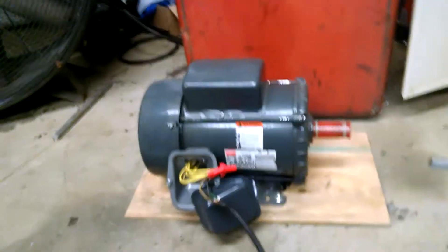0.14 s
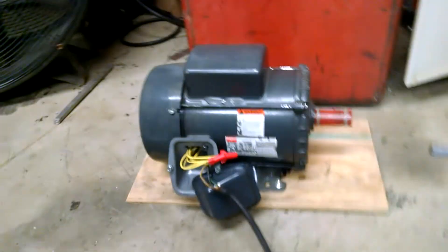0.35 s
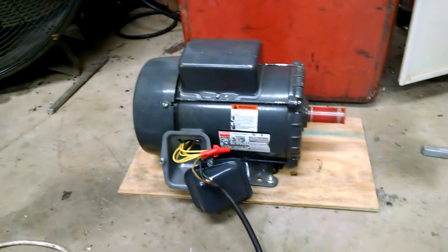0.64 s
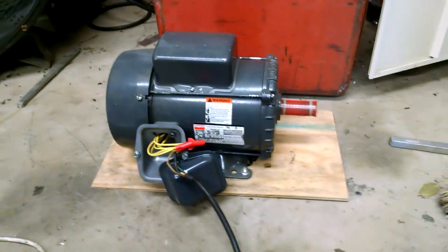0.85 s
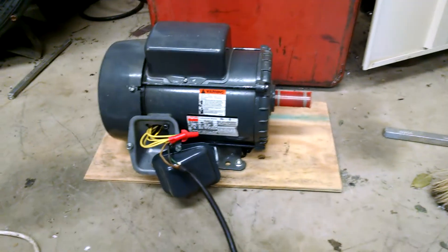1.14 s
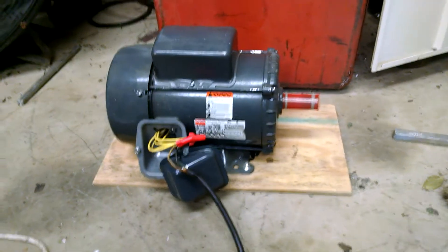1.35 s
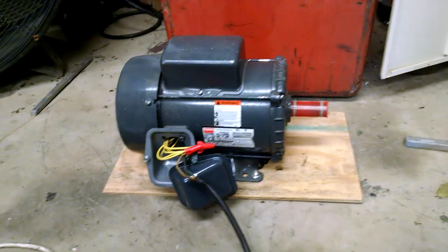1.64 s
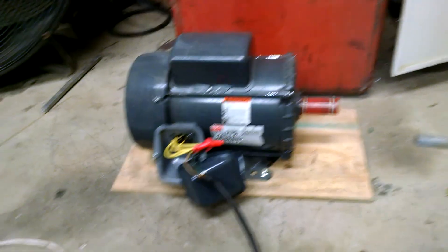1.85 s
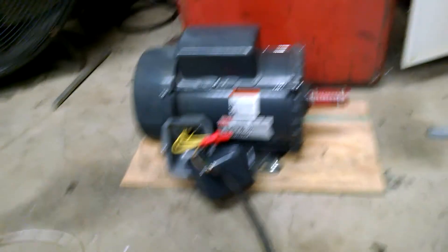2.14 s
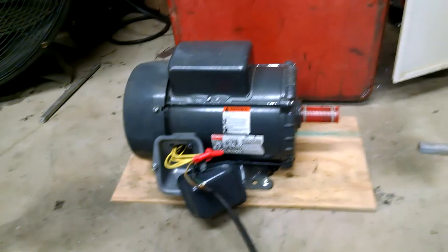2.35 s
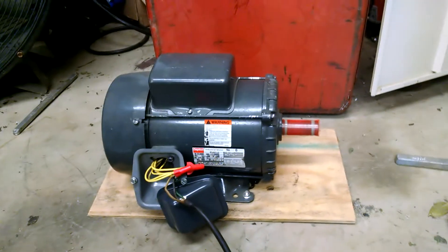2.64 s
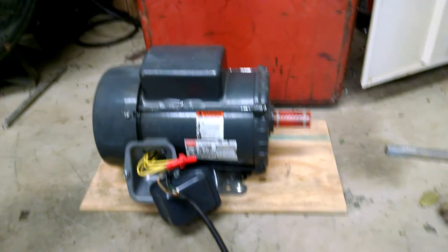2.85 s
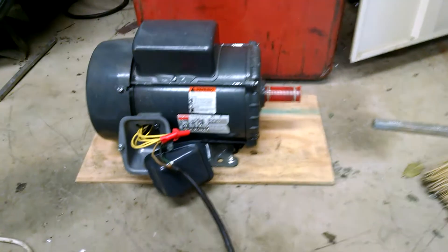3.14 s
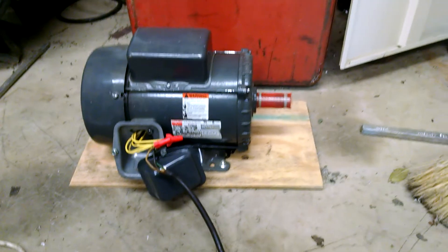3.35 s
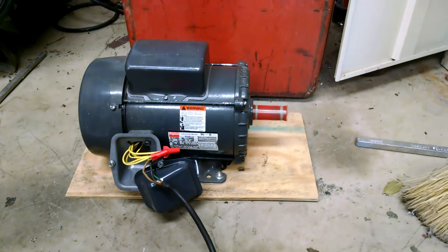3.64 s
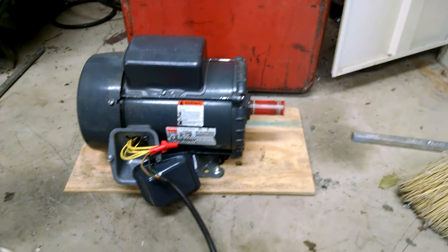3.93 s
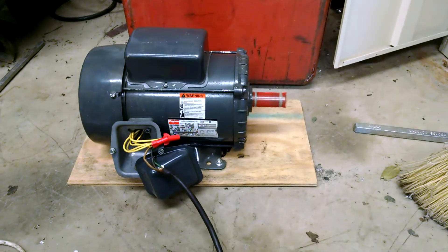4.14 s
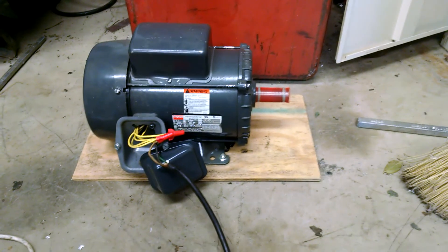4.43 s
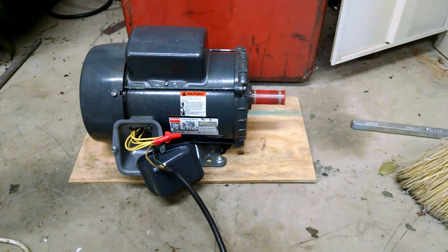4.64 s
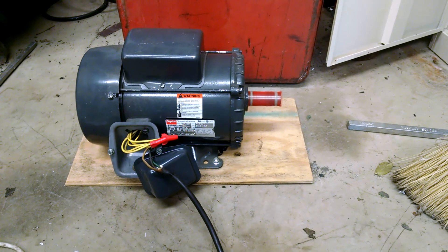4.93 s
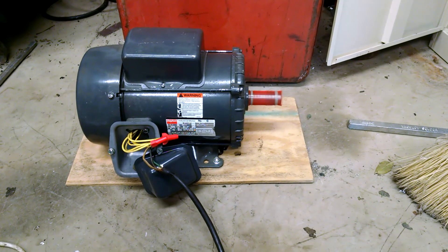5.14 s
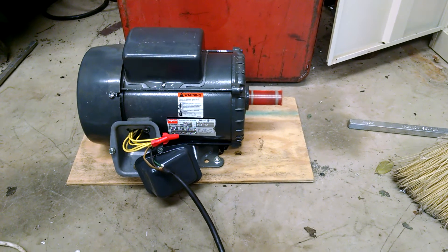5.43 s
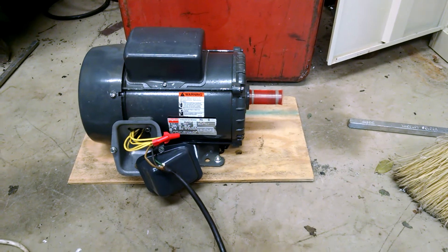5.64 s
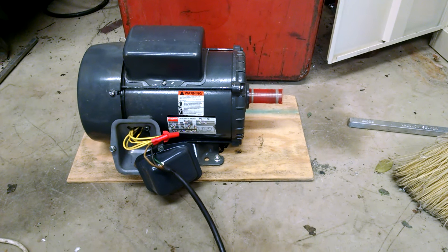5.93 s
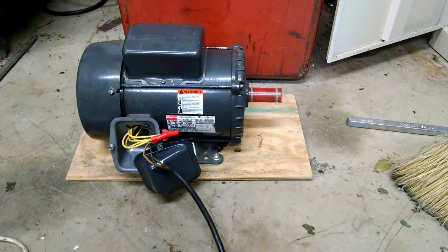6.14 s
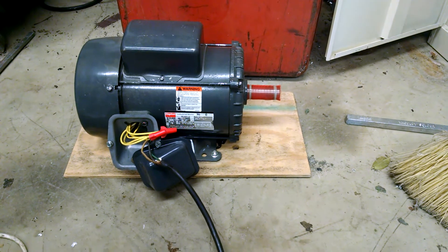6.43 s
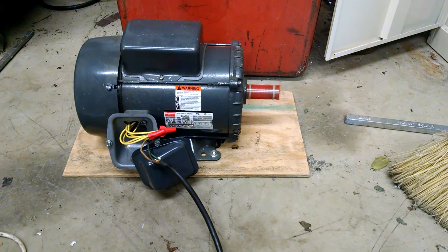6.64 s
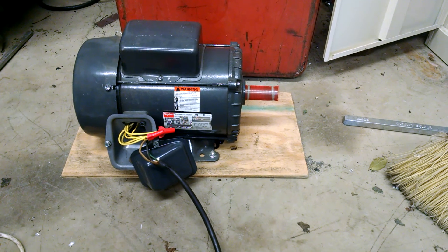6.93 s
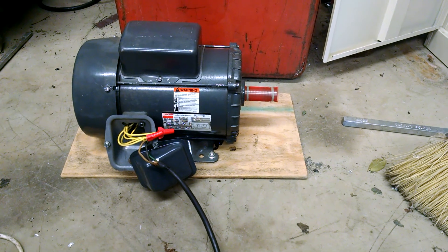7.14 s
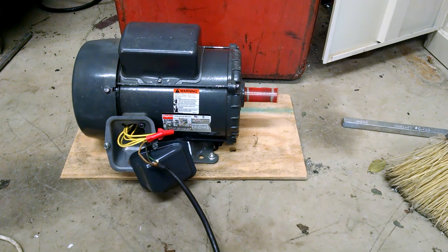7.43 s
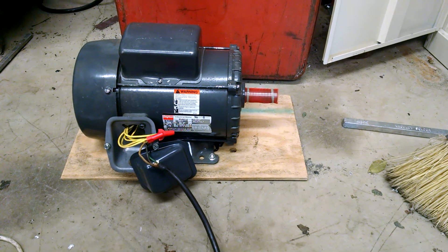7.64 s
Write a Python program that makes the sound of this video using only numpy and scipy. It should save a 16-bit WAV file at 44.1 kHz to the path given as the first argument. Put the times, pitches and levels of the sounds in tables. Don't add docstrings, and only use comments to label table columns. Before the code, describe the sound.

From 0 s an already spinning, unpowered electric motor coasts down, heard close in a workshop. A broad, hollow fan rush coloured by its steel shell, with low rotational hum and fine bearing hiss, starts at about 55 turns a second. Pitch and brightness glide down continuously, while rising automatic gain for nearly 3 s offsets the fading. From about 2 to 4 s a bright, gritty scrape once per turn grows clearer, a rapid flutter slowing to about 25 per second by 6 s as the air sound sinks away. At 6.53 s the switch snaps shut: a very sharp metallic clack, several blows within hundredths of a second, tiny bounces and a short ring. The level ducks abruptly, then recovers from about 6.8 s, bringing up a raspy, resonant metal rub pulsing with each slowing turn, over faint low room rumble and mains hum. The motor is still turning at the end, near 7.8 s.

```python
import sys
import numpy as np
from scipy import signal
from scipy.fft import rfft, irfft, next_fast_len
from scipy.io import wavfile
from scipy.ndimage import map_coordinates

SR = 44100
rng = np.random.default_rng(int(sys.argv[2]) if len(sys.argv) > 2 else 0)


def volts_from_decibels(level):
    exponent = np.asarray(level, float) / 20
    return 10 ** exponent


def int16_out(signal):
    q = np.round(np.clip(np.atleast_2d(signal).T, -1, 1) * 32767)
    wavfile.write(sys.argv[1], SR, q.astype(np.int16))


N = 343078
t = np.arange(N) / SR
SHUT_S = 6.53


def unit(x):
    return x / np.sqrt(np.mean(x ** 2) + 1e-20)


def along(points, hz):
    f, v = np.transpose(points)
    return np.interp(np.log(hz + 1), np.log(f + 1), v)


def wobble(rate):
    knots = rng.standard_normal(int(N * rate / SR) + 4)
    return map_coordinates(knots, [t * rate])


def modes(table, hz, sign=-1):
    total = 0
    for k, (center, width, db) in enumerate(table):
        damping = 1j * hz * width
        total = total + sign ** k * volts_from_decibels(db) * damping / (center * center - hz * hz + damping)
    return total


def filtered(x, response):
    m = next_fast_len(N + SR // 4)
    return irfft(rfft(x, m) * response(np.fft.rfftfreq(m, 1 / SR)), m)[..., :N]


def rush(response):
    return unit(filtered(rng.standard_normal((2, N)), response))


def once_a_turn(turns, sharp):
    each_turn = volts_from_decibels(rng.normal(0, 1.0, int(turns[-1]) + 2))
    strength = each_turn[np.round(turns).astype(int)]
    angle = 2 * np.pi * (turns + .05 * wobble(25))
    return unit(strength * np.exp(sharp * (np.cos(angle) - 1)))


def workshop():
    # frequency in Hz, level in dB per Hz.
    rumble = [(15, -2), (35, 2.5), (90, -14), (200, -20), (500, -8.5)]
    mains_hz, level_db = 60.3, -44
    tone = volts_from_decibels(-5 + 2.5 * wobble(6)) * np.sin(2 * np.pi * mains_hz * t)
    hum = tone * [[1], [1.1]]
    return volts_from_decibels(level_db + 2.5) * (rush(lambda hz: volts_from_decibels(along(rumble, hz))) + hum)


def fan(turns, octaves):
    # frequency in Hz, level in dB per Hz.
    turbulence = [(30, -55), (100, -7), (200, -5), (350, -1.43), (700, 1), (1300, -4), (2300, -5),
                  (3500, -9.5), (5000, -15.5), (8000, -17.5), (12000, -18), (15300, -28)]
    # width in Hz, level in dB.
    shell_hz = [332, 520, 612, 1093, 1568, 1652, 1930, 2610, 3055, 5080]
    shell_rows = [(65, -1), (32.8, -4.5), (70, 3), (45.4, 7.5), (46, 8.5), (26, 7), (63.5, 4.5), (209, 0.5),
                  (78, 6), (457, 5.5)]
    # multiple of the shaft rate, level under the fan in dB.
    orders = [
        (1, -33),
        (2.82, -26),
        (4.68, -19.5),
        (8.02, -23),
    ]
    # frequency in Hz, width in Hz, level in dB.
    board = [(50, 25, 0), (110, 50, 2), (215, 60, 2), (370, 150, 0)]
    shell = [(hz, *row) for hz, row in zip(shell_hz, shell_rows)]

    def shell_response(hz):
        return volts_from_decibels(along(turbulence, hz) - 3) * np.hypot(1, 1.32 * abs(modes(shell, hz, sign=0.98)))

    air = rush(shell_response)
    dull = filtered(air, lambda hz: 1 / (1 + (hz / 1100) ** 4))
    air = dull + volts_from_decibels(2.2 * octaves) * (air - dull)
    shake = 0
    for multiple, db in orders:
        strength = volts_from_decibels(db + 1.5 * wobble(4))
        shake = shake + strength * np.sin(2 * np.pi * multiple * turns + 0.84 * wobble(6))
    shake = volts_from_decibels(7 * octaves) * filtered(shake, lambda hz: modes(board, hz))
    level_db = -25 + 14 * octaves
    return volts_from_decibels(level_db + 3.5) * (volts_from_decibels(0.56 * wobble(7)) * air + shake * [[1], [.3]])


def bearing(turns, speed, octaves):
    # frequency in Hz, level in dB per Hz.
    hiss_spectrum = [(2500, -77), (4500, 1), (6500, -6.5), (8200, -9), (10200, 0.5), (11500, 0.5),
                     (13800, 2), (15400, -3.5)]
    # frequency in Hz, width in Hz, level in dB.
    race = [(7240, 1650, -8), (10230, 1070, -3), (12050, 1200, -5), (13630, 900, 2), (15550, 780, 1.5)]
    film_speed, film_width, film_db = 47, 1.2, -14
    muffling_db = film_db / (1 + np.exp((film_speed - speed) / film_width))
    hiss_db = -39 + 9.5 * octaves
    scrape_db = -34 + 2.5 * octaves + muffling_db
    hiss = rush(lambda hz: volts_from_decibels(along(hiss_spectrum, hz)))
    contact = once_a_turn(turns + .015, sharp=1.7) + .3 * once_a_turn(turns - .3, sharp=.8)
    scrape = contact * rush(lambda hz: modes(race, hz))
    return volts_from_decibels(hiss_db + 8.5) * hiss + volts_from_decibels(scrape_db + 2.4) * scrape


def snap_contacts():
    # start in seconds, level in dB, ring in Hz, ring level in dB, t60 in seconds.
    contacts = [
        (6.517, -34, 10900, -3, 0.13),
        (6.522, -26, 3900, 8, 0.018),
        (6.5283, -11, 4300, 4, 0.023),
        (6.5318, -9, 11800, 4.5, 0.025),
        (6.5353, -19.5, 1100, 13.5, 0.059),
        (6.538, -5.5, 12500, -13, 0.034),
        (6.543, -15, 3520, -10, 0.49),
        (6.569, -21, 12800, 8, 0.034),
        (6.586, -24, 14000, 1, 0.035),
    ]
    snap, u = np.zeros((2, N)), t[:SR // 4]
    for start, db, hz, ring_db, t60 in contacts:
        crack = rng.standard_normal((2, len(u)))
        ring = unit(signal.lfilter(*signal.iirpeak(hz, 6.5, SR), crack))
        envelope = volts_from_decibels(db - 60 * u / t60) * (1 - np.exp(-u / .0004))
        snap[:, round(start * SR):][:, :len(u)] += envelope * (crack + volts_from_decibels(ring_db) * ring)
    spectrum = [(400, -36), (1500, -9.0), (4000, -2), (12000, 1.5)]  # Hz, dB
    return filtered(snap, lambda hz: volts_from_decibels(along(spectrum, hz)))


def ringing_plate():
    # frequency in Hz, level in dB, t60 in seconds.
    plate_rings = [(1150, -24, 0.39), (1210, -27, 0.38), (3670, -26, 0.78), (3520, -28, .4)]
    after = np.maximum(t - SHUT_S - .004, 0)
    total = 0
    for hz, db, t60 in plate_rings:
        envelope = volts_from_decibels(db - 60 * after / t60 + 3 * wobble(60))
        total = total + envelope * np.sin(2 * np.pi * hz * after)
    return total


def switch(turns):
    # frequency in Hz, width in Hz, level in dB.
    plate = [(1180, 57, -16), (1633, 8.4, 4.5), (2032, 85, 3), (3270, 690, -6.5), (3710, 40, 5),
             (4000, 110, -2), (7120, 350, -9), (10300, 480, -2.5), (11460, 300, -1), (12300, 590, -2),
             (13700, 620, -2.5), (14800, 370, -4)]
    snap = snap_contacts() + ringing_plate()
    rub = rush(lambda hz: np.hypot(.2, abs(modes(plate, hz))))
    rub = rub * (1 + 0.17 * once_a_turn(turns + 0.03, sharp=0.79))
    drag_db = -36
    return snap + (t > 6.54) * volts_from_decibels(drag_db + 10) * rub


def ports(pair):
    # frequency in Hz, coherence from 0 to 1.
    alike = [(40, .05), (70, .4), (130, .75), (300, .65), (430, .6), (600, .88), (1100, .97), (1500, .9),
             (2200, .62), (4000, .72), (8000, .76), (9000, .72), (10500, .9), (14000, .96)]
    # frequency in Hz, left minus right in dB.
    left_minus_right = [(60, -13), (130, -2.5), (290, -2), (640, -1.5), (1410, 0.0), (3100, -3), (6820, -3),
                        (15000, -2.5)]
    # frequency in Hz, lag in half cycles.
    half_cycles = [(1420, 0), (2420, 1), (5170, 3), (6400, 4), (7830, 5), (9080, 6), (16500, 12)]

    def mixing(hz):
        angle = np.arccos(np.clip(along(alike, hz), 0, 1)) / 2
        return np.array([np.cos(angle), np.sin(angle)])

    def level_and_phase(hz):
        lag = np.pi * np.interp(hz, *np.transpose(half_cycles))
        side = (np.log(volts_from_decibels(along(left_minus_right, hz))) - 1j * lag) / 2
        return np.exp([side, -side])

    shared, apart = filtered(pair, mixing)
    return filtered(np.array([shared + apart, shared - apart]), level_and_phase)


def scene():
    # time in seconds, shaft speed in turns per second.
    coasting = [(0.0, 55.06), (1.0, 48.4), (2.0, 42.48), (3.0, 37.18), (4.0, 32.61), (5.0, 28.51),
                (6.0, 24.83), (6.53, 23.25), (7.1, 20.38), (7.78, 16.36)]
    speed = np.interp(t, *np.transpose(coasting))
    turns = .37 + np.cumsum(speed) / SR
    octaves = np.log2(speed / 37)
    metal = (bearing(turns, speed, octaves) + switch(turns)) * [[1], [.7]]
    return ports(fan(turns, octaves) + metal + workshop())


def gain_db():
    start_db, climb_db_per_s = -24.5, 9
    duck_db, duck_s, hold_s = -14.5, 0.029, 0.23
    since = np.maximum(t - SHUT_S, 0)
    duck = duck_db * (1 - np.exp(-since / duck_s)) + climb_db_per_s * np.maximum(since - hold_s, 0)
    return np.minimum(start_db + climb_db_per_s * t, 0) + np.minimum(duck, 0)


def joint_stereo(x):
    # frequency in Hz, weaker under stronger in dB when dull, the same when bright.
    limits = [(900, -30, -30), (1250, -15, -17), (2400, -24, 2), (2900, -14, -6), (3800, -5, -3),
              (5200, -6.5, -3), (7800, -3.5, -7), (9000, -11.5, -11.5)]
    band_edges = [*range(0, 96, 8),
                  96, 108, 120, 132, 144, 160, 176, 196, 216, 240, 264, 292, 320, 352, *range(384, 1025, 8)]
    lead = 116
    pair = np.pad([x[0] + x[1], x[0] - x[1]], ((0, 0), (lead, 0)))
    frame = dict(window="cosine", nperseg=2048, noverlap=1024)
    hz, _, z = signal.stft(pair, SR, **frame)
    power = abs(z) ** 2
    treble = power[:, hz > 8000].sum((0, 1))
    treble_db = 10 * np.log10(treble / power.sum((0, 1)) + 1e-9)
    bright = np.clip((treble_db + 14) / 11, 0, 1)
    f, dull_db, bright_db = np.transpose(limits)
    limit_db = np.outer(np.interp(hz, f, dull_db), 1 - bright)
    limit_db = limit_db + np.outer(np.interp(hz, f, bright_db), bright)
    which = np.searchsorted(band_edges, np.arange(len(hz)), "right") - 1
    band = np.add.reduceat(power, band_edges, axis=1)[:, which]
    loud_db = 10 * np.log10(treble + 1e-12)
    loud_db = loud_db - np.median(loud_db)
    limit_db = limit_db + np.outer(np.clip(hz / 7000 - .6, 0, .5), loud_db)
    limit_db = limit_db + rng.normal(0, 1.3, (len(band_edges), len(bright)))[which]
    keep = (band > band[::-1] * volts_from_decibels(limit_db) ** 2) | (loud_db > 14)
    total, difference = signal.istft(z * keep, SR, **frame)[1][:, lead:][:, :N]
    return np.array([total + difference, total - difference]) / 2


def band_limit(x):
    return signal.sosfilt(signal.butter(12, 15960, fs=SR, output="sos"), x)


def record(dry):
    top_hz = 15480
    heard = filtered(volts_from_decibels(gain_db()) * dry, lambda hz: hz < top_hz)
    return band_limit(joint_stereo(np.clip(heard, -1, 1)))


dry = scene()
out = record(dry)
int16_out(out)
```